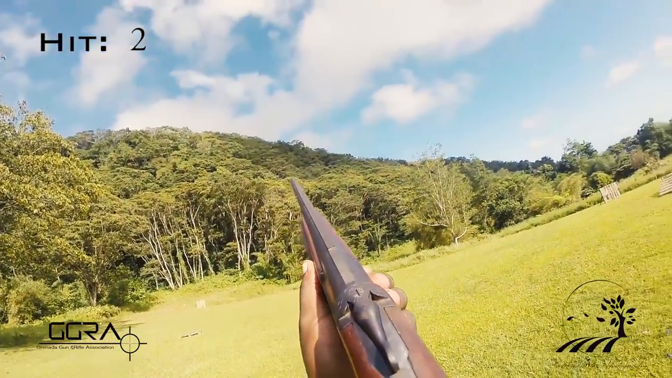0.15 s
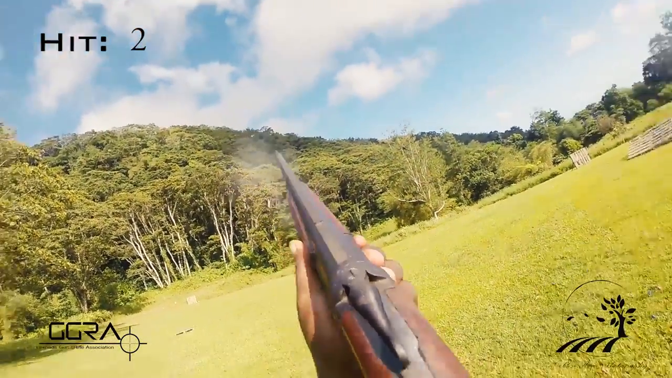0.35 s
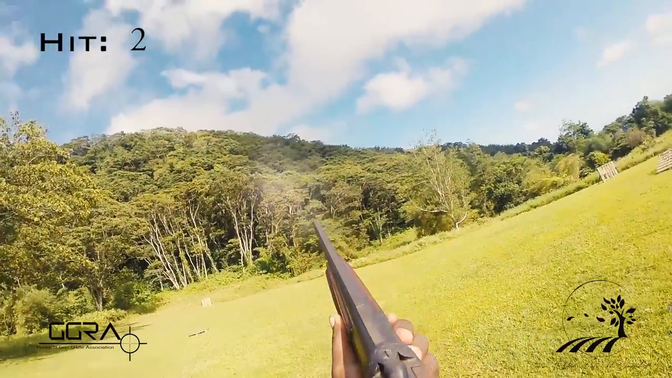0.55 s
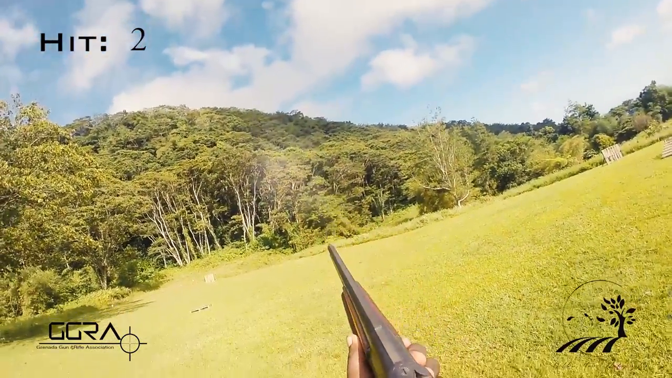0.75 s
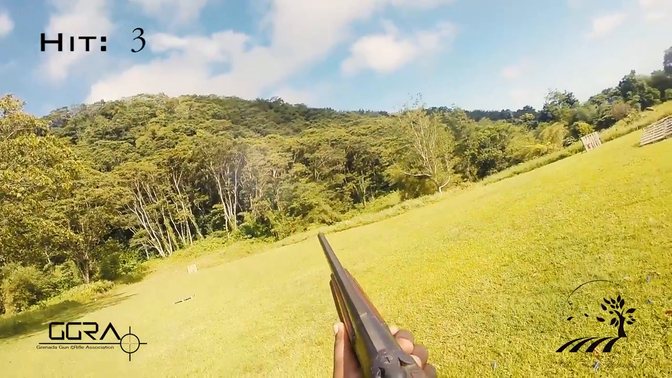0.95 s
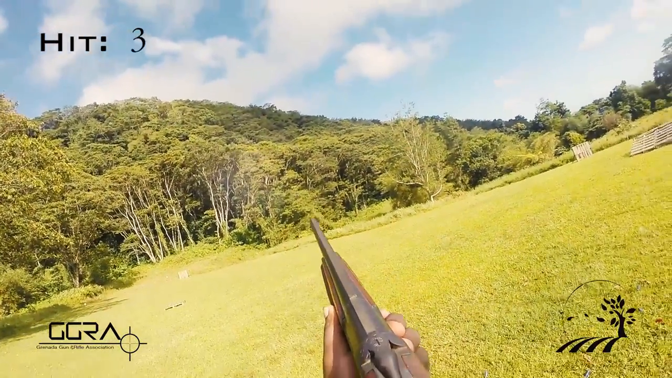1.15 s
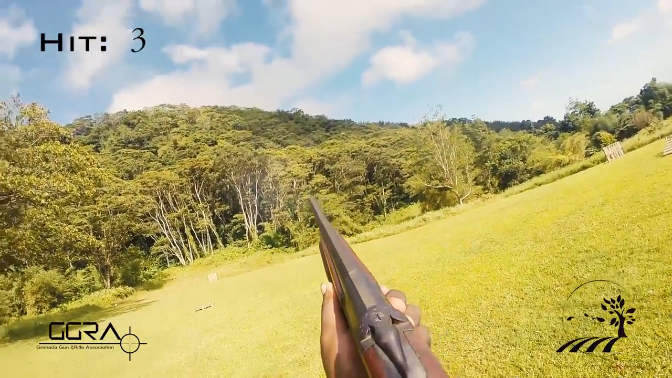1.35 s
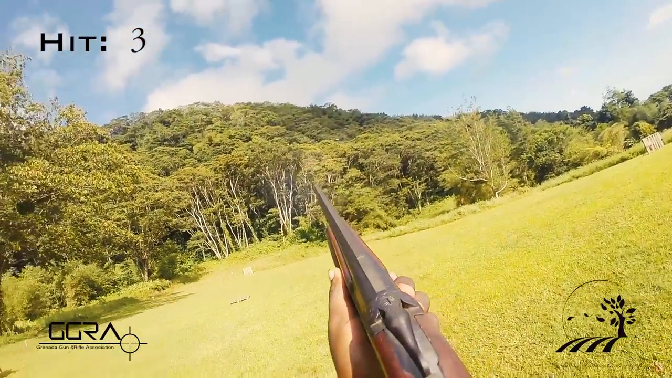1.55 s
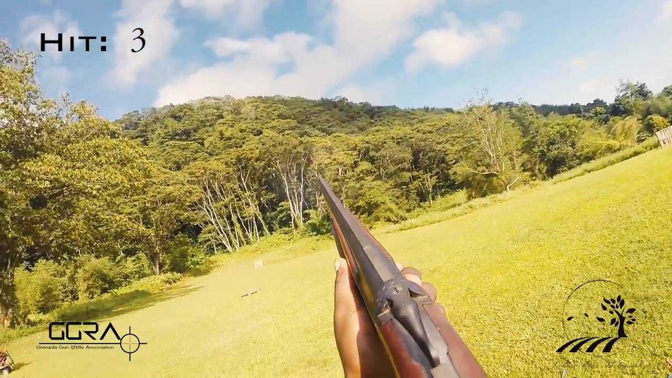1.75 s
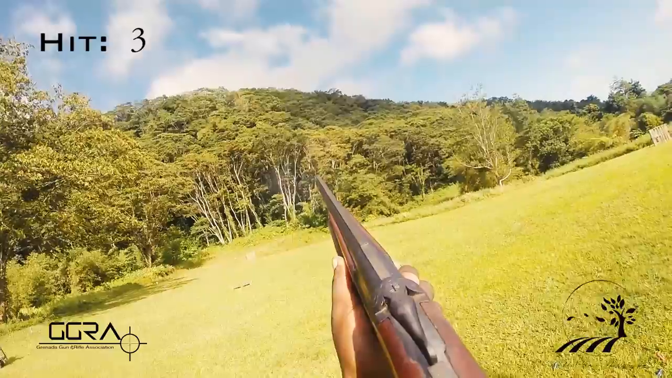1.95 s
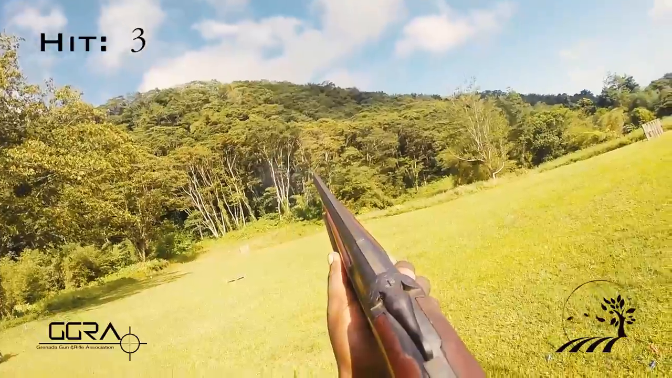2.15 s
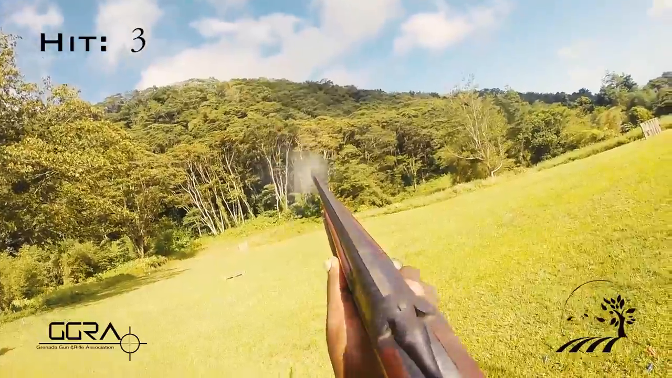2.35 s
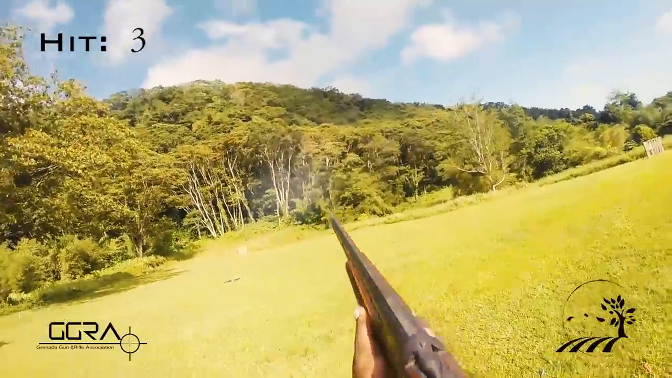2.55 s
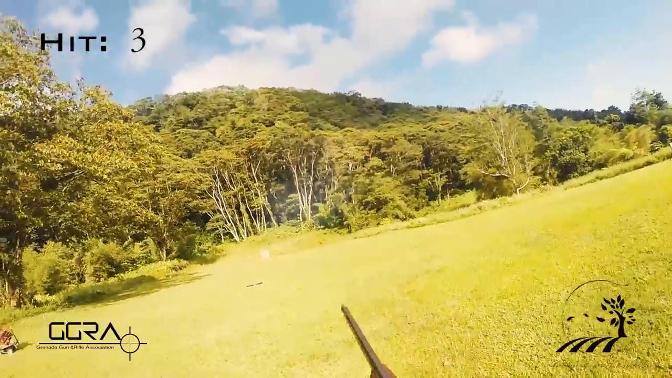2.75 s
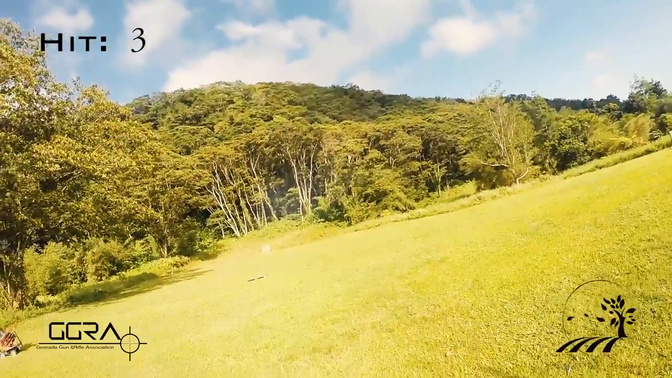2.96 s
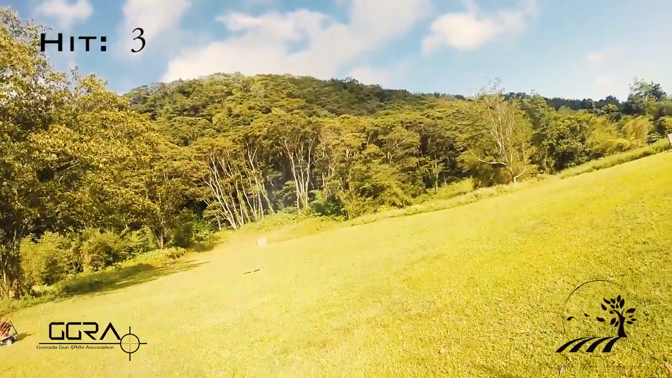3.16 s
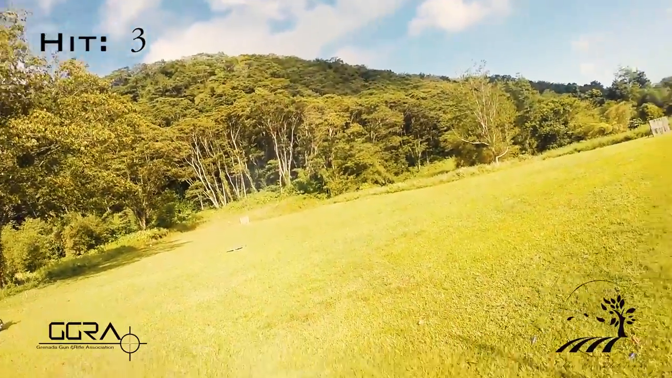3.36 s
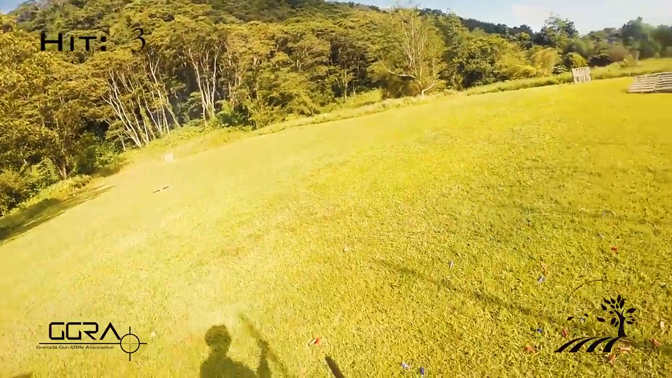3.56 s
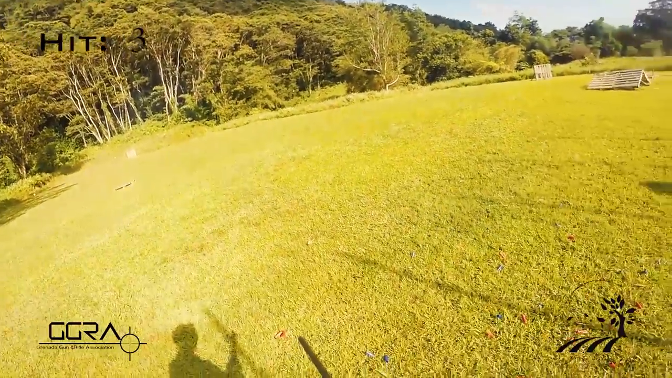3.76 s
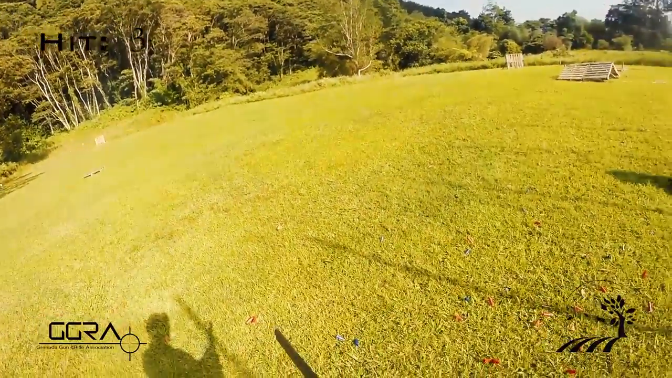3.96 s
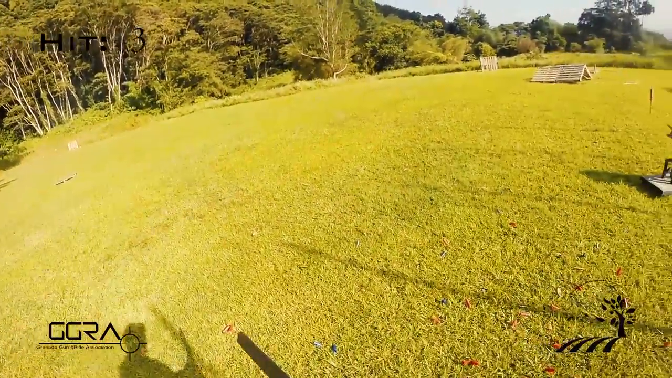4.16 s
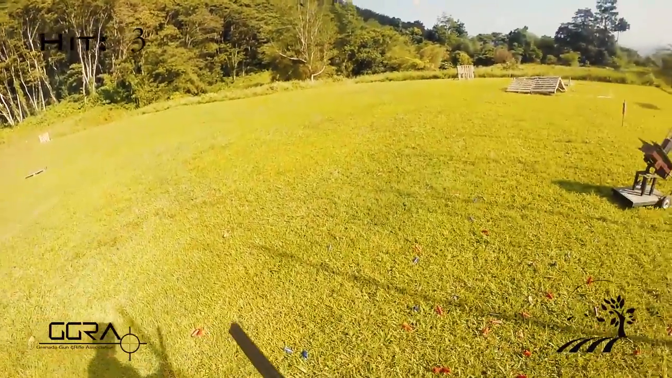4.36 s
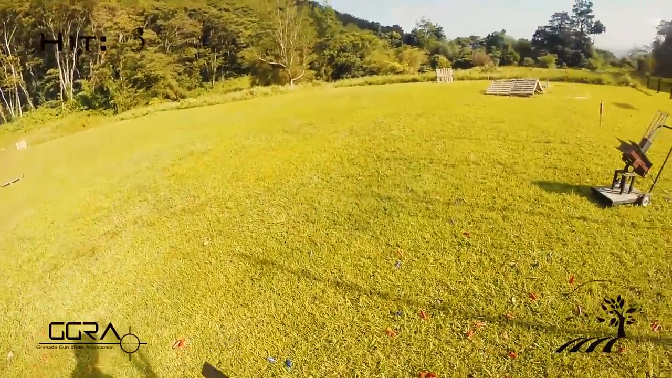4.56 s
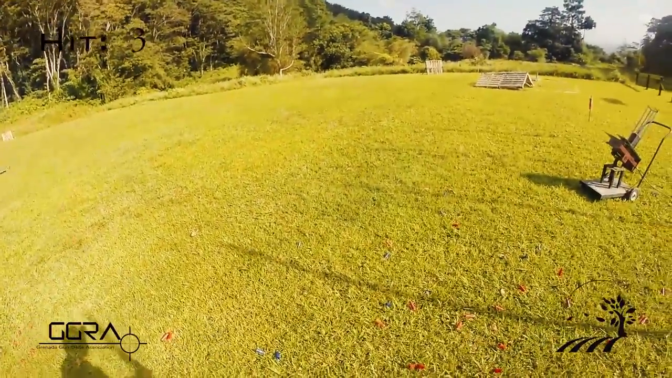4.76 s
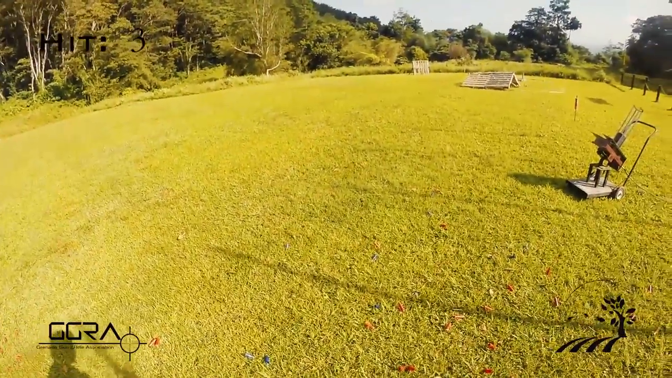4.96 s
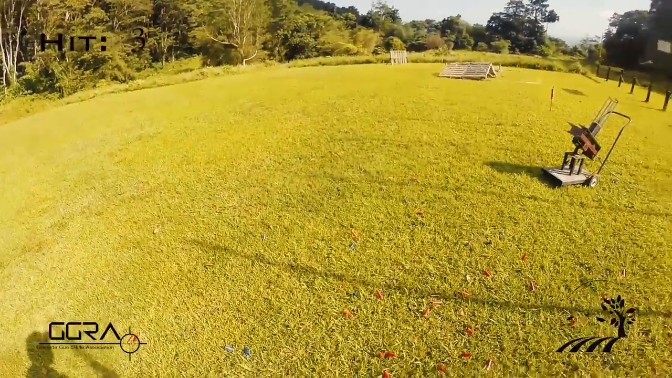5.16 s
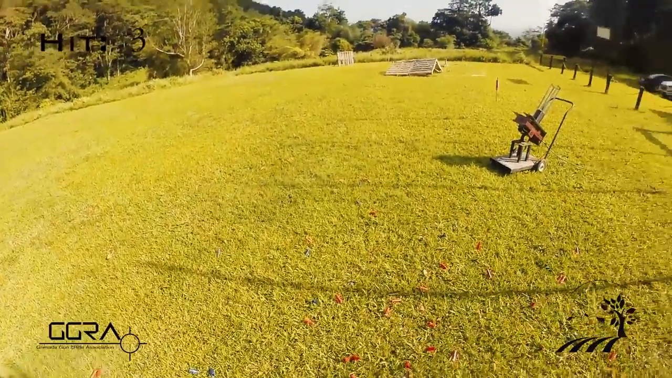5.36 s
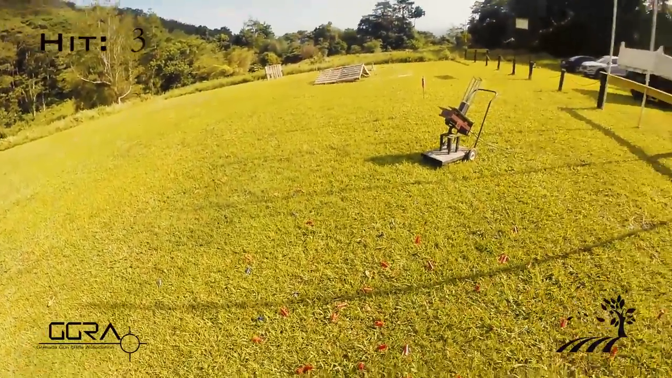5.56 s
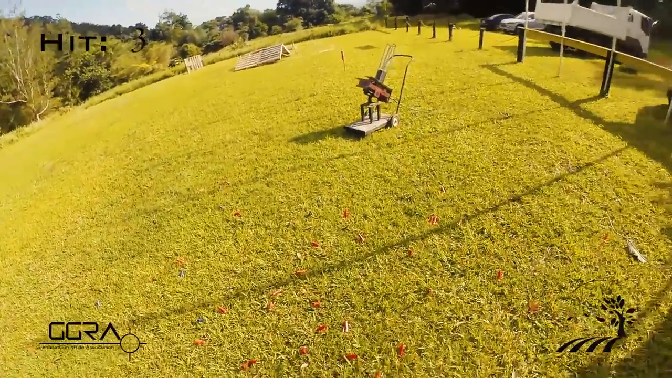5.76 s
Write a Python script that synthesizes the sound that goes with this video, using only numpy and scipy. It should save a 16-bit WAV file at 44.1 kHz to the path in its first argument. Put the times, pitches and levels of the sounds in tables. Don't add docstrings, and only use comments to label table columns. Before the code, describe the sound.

Two sharp shotgun blasts two seconds apart on open grass, each echoing off trees, then the gun clacks open amid faint handling bumps.

```python
import sys
import numpy as np
from scipy import signal
from scipy.fft import next_fast_len
from scipy.io import wavfile
from scipy.ndimage import uniform_filter1d

SR = 44100
rng = np.random.default_rng(int(sys.argv[2]) if len(sys.argv) > 2 else 0)


def dump_mix(stems):
    frames = np.atleast_2d(stems).T
    limited = np.clip(frames, -1, 1)
    pcm = np.round(limited * 32767).astype(np.int16)
    wavfile.write(sys.argv[1], SR, pcm)


def magnitude_from_level(level_db):
    exponent = np.asarray(level_db, float) / 20
    return 10 ** exponent


N = 255838
TIME = np.arange(N) / SR


def level(x, db):
    return x * magnitude_from_level(db) / np.sqrt(np.mean(x ** 2))


def ring(x, hz, width):
    return signal.lfilter(*signal.iirpeak(hz, hz / width, fs=SR), x)


def band(x, lo_hz, hi_hz):
    return signal.sosfilt(signal.butter(2, [lo_hz, hi_hz], "bandpass", fs=SR, output="sos"), x)


def noise():
    return rng.standard_normal(N)


def fade(t60, rise=0.0003):
    age = TIME[:int(1.2 * t60 * SR)]
    return (1 - np.exp(-age / rise)) * np.exp(-np.log(1000) * age / t60)


def walk(rate):
    k = int(SR / rate)
    steps = np.repeat(rng.standard_normal(N // k + 1), k)
    return 0.38 * uniform_filter1d(uniform_filter1d(steps, k), k)[:N]


def put(s, sound):
    out, start = np.zeros(N), int(round(s * SR))
    out[start:start + len(sound)] = sound[:N - start]
    return out


def puff(t60, rise=0.0005):
    shape = fade(t60, rise)
    return shape * rng.standard_normal(SR)[:len(shape)]


def struck(hz, t60, rise):
    shape = fade(t60, rise)
    return shape * np.sin(2 * np.pi * hz * TIME[:len(shape)])


# (t/s, peak level/dB, half length/s)
JOLTS = [(0.0, -40, 0.036), (0.1, -40, 0.015), (0.172, -41.5, .025), (0.477, -37, .045),
         (0.873, -51.5, .12), (1.405, -47.5, 0.28), (1.436, -33, 0.017), (1.53, -35.5, 0.019),
         (1.601, -38, 0.025), (1.755, -45, .04), (1.865, -40, 0.052), (2.07, -43, 0.071),
         (2.28, -41.5, .07), (2.58, -33.5, 0.04), (2.959, -53, 0.051), (3.07, -49.5, 0.021),
         (3.519, -45, 0.14), (3.67, -44, 0.024), (3.94, -40.5, 0.055), (4.024, -45.5, 0.032),
         (4.17, -49.5, 0.073), (4.349, -39, 0.043), (4.556, -34, 0.034), (4.72, -37.5, 0.062),
         (4.833, -32, .035), (4.948, -26.5, 0.031), (5.116, -35.5, 0.047), (5.31, -46, .07),
         (5.73, -53, .08)]
# (t/s, level/dB)
GUST = [(0.0, -41.5), (.24, -44.5), (.48, -37), (.58, -77), (1.45, -47), (1.92, -45), (2.0, -43.5),
        (2.37, -48.5), (2.47, -29.5), (2.65, -65.5), (2.8, -77.5), (3.63, -66), (3.83, -67), (4.6, -60),
        (4.94, -52.5), (5.02, -61), (5.4, -59), (5.8, -57)]
SWAY_DB = -57


def rumble():
    x = ring(ring(noise(), 35, 29), 33, 28)
    x = x / (np.abs(signal.hilbert(x, next_fast_len(N))[:N]) + 0.44 * x.std())
    free = 1 - sum(put(s - .01, np.hanning(4400) ** .3) for s, *_ in SHOTS)
    effort = magnitude_from_level(SWAY_DB) + sum(magnitude_from_level(db) * np.exp(-((TIME - s) / half) ** 2) for s, db, half in JOLTS)
    knocks = band(level(x, 0.) * effort * free, 28, 65)
    wind = magnitude_from_level(np.interp(TIME, *np.transpose(GUST))) * free
    gusts = level(ring(ring(noise(), 44, 30), 44, 30), -2.) * wind
    flutter = level(band(band(noise(), 62, 115), 62, 115), -13.) * wind
    return knocks + gusts + flutter


# (f/Hz, level per Hz/dB)
AIR = [(80, -6.5), (113, -9.5), (226, -10), (640, -17.5), (1280, -21), (5120, -32), (7240, -38),
       (14500, -45.5)]
# (f/Hz, width/Hz, level/dB)
HISS_PEAKS = [(5032, 110, -76.5), (10000, 220, -79.5), (8060, 250, -87)]
AIR_DB = -56.5


def air():
    hz, db = np.transpose(AIR)
    swell, out = walk(0.39), 0
    for centre in 80 * 2 ** np.arange(0, 7.7, .5):
        flicker = walk(8.3) * min(1.5, 600 / centre)
        part = band(noise(), centre * 2 ** -.25, centre * 2 ** .25)
        band_db = np.interp(np.log(centre), np.log(hz), db)
        out = out + magnitude_from_level(band_db + .6 * swell + flicker) * part
    peaks = sum(level(ring(noise(), f, width), peak_db) for f, width, peak_db in HISS_PEAKS)
    return level(out, AIR_DB) + peaks


DUCK_DB, DUCK_HOLD_S, DUCK_BACK_S = -14.5, 0.43, 0.35


def duck():
    db = 0
    for s, *_ in SHOTS:
        recovering = np.maximum(TIME - s - DUCK_HOLD_S, 0)
        db = db + DUCK_DB * (TIME > s) * np.exp(-recovering / DUCK_BACK_S)
    return magnitude_from_level(db)


# (t/s, peak
# level/dB, centre f/Hz, t60/s)
TICKS = [(.002, -46, 1350, 0.036), (.083, -46.5, 1480, 0.033), (.111, -53, 1470, 0.067),
         (.224, -51, 1350, .11), (.971, -40, 3500, 0.098), (1.0, -43, 1370, 0.81),
         (2.1425, -44, 1410, 0.033), (3.638, -43.5, 1410, 0.078), (5.068, -53.5, 4400, .1),
         (5.128, -55.5, 3850, 0.18), (5.127, -56, 4400, .057), (5.201, -61, 4400, .061),
         (5.199, -59, 5200, .066)]
# (t/s, peak level/dB, centre f/Hz, t60/s)
SCUFFS = [(.083, -53, 6000, .067), (2.1423, -48.5, 2760, .058), (2.141, -50.5, 6290, .072),
          (3.527, -34.5, 2080, 0.011), (3.5272, -47, 900, 0.016), (3.639, -41.5, 2340, 0.075),
          (3.64, -56, 5000, .11), (4.585, -45, 2590, .039), (4.74, -58, 6500, .027),
          (4.76, -47.5, 1740, 0.36), (4.978, -38.5, 1710, 0.013), (5.071, -53.5, 5500, .1),
          (5.13, -58, 5500, .15), (5.076, -47, 1300, 0.27), (5.072, -49.5, 2700, .2),
          (5.125, -51.5, 2200, .25)]
TICK_WIDTH_HZ = 220
SCUFF_WIDTH, RISE_SHARE = 0.41, 0.02


def ticks():
    rows = [(*row, TICK_WIDTH_HZ) for row in TICKS]
    rows += [(*row, SCUFF_WIDTH * row[2]) for row in SCUFFS]
    out = 0
    for s, db, hz, t60, width in rows:
        rung = ring(ring(puff(t60, RISE_SHARE * t60), hz, width), hz, width)
        out = out + put(s, magnitude_from_level(db) * rung / np.abs(rung).max())
    return out


# (blast t/s, blast level/dB, hammer lead/s, hammer level/dB)
SHOTS = [
    (0.3343, 3, .0045, -20),
    (2.458, 5, .005, -10.5),
]
# (case thump level/dB, delay/s)
RECOIL = [(-9, 0.01), (-10, .012)]
# (f/Hz, level/dB, rise/s, t60/s)
BLAST_MODES = [(330, -17, 0.00011, 0.0066), (1170, 5, 0.000091, 0.0072), (1350, -2, 0.00077, 0.018),
               (2064, -1.5, 0.0025, 0.019), (2356, 7, 0.0014, 0.012), (2820, -5, 0.0018, 0.026),
               (3520, -1, 0.000027, 0.012), (5200, -13.5, 0.00053, 0.018), (7800, -11, 0.000058, 0.011)]


def shots():
    out = 0
    limiter = magnitude_from_level(-9 * np.clip((TIME - .0024) / 0.0041, 0, 1))
    for (s, blast_db, lead, hammer_db), (thump_db, delay) in zip(SHOTS, RECOIL):
        rung = sum(put(0, -magnitude_from_level(db) * struck(hz, t60, rise)) for hz, db, rise, t60 in BLAST_MODES)
        gas = put(0, band(puff(0.013, 0.00018), 1800, 10500))
        out = out + put(s, magnitude_from_level(blast_db) * limiter * (rung + magnitude_from_level(-10) * gas))
        rattle = puff(0.038, 0.00082)
        stock = magnitude_from_level(17.5) * ring(rattle, 2700, 500)
        clatter = magnitude_from_level(2.0) * band(band(rattle, 1700, 6800), 1000, 7700)
        out = out + put(s - lead, magnitude_from_level(hammer_db) * (stock + clatter))
        out = out + put(s + delay, magnitude_from_level(thump_db) * struck(45, 0.1, .008))
    return out


# (f/Hz, width/Hz, level/dB)
CASE = [(1415, 110, 5.5), (2330, 130, -6), (2760, 34, -5.5), (3500, 23, -10), (4400, 130, -14),
        (5200, 140, -11), (6500, 220, -18), (7850, 300, -24)]


def case(x, leak_db=-20):
    return sum(magnitude_from_level(db) * ring(x, hz, width) for hz, width, db in CASE) + magnitude_from_level(leak_db) * x


# (t/s, peak level/dB, pulse
# length/ms, crackle level/dB)
SLAPS = [(0.3426, -22, .8, -31), (0.3964, -20, 1.2, -35), (0.4, -32, 1.1, -41), (0.4257, -20.5, 8.9, -28),
         (0.4264, -27, 1.8, -25.5), (0.467, -40, 2.5, -50), (0.841, -44.5, 1.5, -41),
         (2.466, -15.5, .8, -29.5), (2.4907, -23.5, 1.4, -40), (2.501, -28, 2.4, -37),
         (2.5346, -24, 4.1, -28), (2.9646, -37, 1.6, -60)]


def slaps():
    age = TIME[:900]
    shock = sum(put(s, magnitude_from_level(db) * (1 - age / ms * 3000) * np.exp(-age / ms * 2200))
                for s, db, ms, _ in SLAPS)
    rounded = band(band(shock, 60, 1900), 130, 2000)
    edges = sum(put(s, magnitude_from_level(db) * puff(0.015, 0.00017)) for s, _, _, db in SLAPS)
    crackle = magnitude_from_level(7.5) * ring(edges, 2900, 1400) + magnitude_from_level(-3.0) * ring(edges, 4800, 1000)
    return magnitude_from_level(3.5) * rounded + magnitude_from_level(8) * case(rounded) + band(band(crackle, 1000, 5800), 800, 6000)


# (echo level/dB, stretch of the echo delays/1)
AIM = [(.5, 1.0), (0, 1.06)]
# (delay/s, level near 1.4 kHz/dB, boom relative level/dB, depth/s, t60/s)
BELTS = [(.008, -39, -12.5, 0.0036, 0.29), (.03, -45, -17.5, .06, .3), (.105, -43.5, -19, .04, .2),
         (0.168, -57, -15, 0.23, .4), (0.306, -53, -9.5, .03, .5), (.33, -54, -13.5, .3, 1.2),
         (.5, -57, 0, 0.075, 0.71), (.64, -54.5, -1.5, 0.125, 1.5), (.8, -56.5, 1, .3, 1.5)]
BELT_RISE_S = .006
TREBLE_NEAR_DB, TREBLE_MID_DB, TREBLE_FAR_DB, GRASS_S, AIR_LOSS_S = 1, -11, -21, .025, .25
HAZE_DB, HAZE_T60_S = -60.5, 1.8
CROWNS_DB, CROWNS_S, CROWNS_SPREAD_S = -66.5, 0.31, 0.03


def belts():
    mid, boom, top = 1e-12, 1e-12, 1e-12
    for (s, *_), (aim_db, stretch) in zip(SHOTS, AIM):
        age = np.maximum(TIME - s, 0)
        air_loss_db = (TREBLE_MID_DB - TREBLE_FAR_DB) * np.exp(-age / AIR_LOSS_S)
        grass_loss_db = (TREBLE_NEAR_DB - TREBLE_MID_DB) * np.exp(-age / GRASS_S)
        dull_db = TREBLE_FAR_DB + air_loss_db + grass_loss_db
        top = top + (age > 0) * magnitude_from_level(HAZE_DB - 60 * age / HAZE_T60_S) ** 2
        top = top + magnitude_from_level(2 * CROWNS_DB) * np.exp(-((age - CROWNS_S) / CROWNS_SPREAD_S) ** 2)
        for delay, db, boom_db, depth, t60 in BELTS:
            since = np.maximum(age / stretch - delay, 0)
            decay = magnitude_from_level(db + aim_db - 60 * np.maximum(since - depth, 0) / t60)
            power = (decay * (1 - np.exp(-since / BELT_RISE_S))) ** 2
            mid = mid + power
            boom = boom + power * magnitude_from_level(2 * boom_db)
            top = top + power * magnitude_from_level(2 * dull_db)
    return np.sqrt(mid), np.sqrt(boom), np.sqrt(top)


def wash():
    mid_gain, boom_gain, top_gain = belts()
    mid = level(case(band(noise(), 750, 3400), leak_db=-13), 0.)
    mid = mid * mid_gain * magnitude_from_level(5.6 * walk(110) + 3.5 * walk(35))
    boom = level(band(band(noise(), 210, 760), 200, 1800), 0.) * boom_gain
    deep = level(band(noise(), 87, 180), -41.) * boom_gain ** 0.45
    top = level(case(band(band(noise(), 3600, 6900), 2500, 12500), leak_db=-15.5), 0.)
    top = top * top_gain * magnitude_from_level(1.6 * walk(130))
    fizz = level(band(noise(), 10500, 13500), -23.5) * top_gain
    return band(mid + top, 400, 12000) + boom + deep + fizz


# (t/s, peak level/dB, t60/s, top edge f/Hz)
CLAY = [
    (0.9716, -32.5, 0.1, 13000),
    (1.0064, -34.5, 0.68, 4570),
    (1.023, -37, 0.085, 10900),
    (1.048, -40, 0.25, 8500),
    (1.1, -45.5, 0.48, 7130),
]


def clay():
    burst = 0
    for s, db, t60, top_hz in CLAY:
        crack = band(band(puff(t60, 0.00082), 1700, top_hz), 1500, 13000)
        burst = burst + put(s, magnitude_from_level(db) * crack)
    return magnitude_from_level(9.5) * magnitude_from_level(2.7 * walk(150)) * band(case(burst, leak_db=-22.5), 1440, 14000)


# (t/s, level/dB, f/Hz, length/s)
CHIRPS = [
    (1.237, -78, 5600, 0.021),
    (1.275, -62, 5600, 0.025),
    (2.218, -64.5, 5150, .06),
    (2.306, -63, 5580, 0.016),
    (2.335, -61, 5700, .018),
    (4.117, -62.5, 5150, 0.062),
]


def chirps():
    out = 0
    for s, db, hz, length in CHIRPS:
        age = TIME[:int(length * SR)]
        note = (age * 62) % 1
        tone = np.sin(2 * np.pi * np.cumsum(hz * (1 + .03 * (note - .5))) / SR)
        out = out + put(s, magnitude_from_level(db) * np.sin(np.pi * note) * np.hanning(len(age)) ** .5 * tone)
    return out


# (t/s, peak level/dB, bright relative level/dB, rattle t60/s)
CLICKS = [
    (4.8767, -31, -4.5, 0.026),
    (4.905, -31.5, -3.5, 0.019),
    (4.9231, -40, 0, 0.025),
    (4.935, -17, -3.5, 0.031),
    (4.9387, -18, -6, 0.017),
]
# (f/Hz, level/dB, t60/s)
ACTION = [(1423, -6, 0.018), (1930, -7, 0.018), (2430, -3, 0.017), (2700, 6.5, 0.023), (3160, -5.5, 0.058),
          (3550, -28, 0.039), (5320, 0, .022), (6000, -1.5, 0.088), (6830, -4, 0.045), (7390, -3, 0.016)]
CLICK_RISE_S = 0.0012


def action():
    grit = magnitude_from_level(2.8 * walk(900))
    dull = grit * sum(put(s, magnitude_from_level(db) * puff(t60, CLICK_RISE_S)) for s, db, _, t60 in CLICKS)
    bright = grit * sum(put(s, magnitude_from_level(db + rel_db) * puff(t60, CLICK_RISE_S / 2))
                        for s, db, rel_db, t60 in CLICKS)
    body = sum(magnitude_from_level(db) * ring(dull if hz < 4000 else bright, hz, 2.77 / t60) for hz, db, t60 in ACTION)
    clack = magnitude_from_level(-2) * band(dull, 2000, 2800)
    sizzle = magnitude_from_level(-6) * band(band(bright, 5000, 10100), 5000, 16000)
    return magnitude_from_level(12.0) * band(body, 910, 17000) + clack + sizzle


def scene():
    blasts = shots() + slaps() + wash()
    small = clay() + action() + ticks() + chirps()
    background = rumble() + duck() * air()
    return (blasts + small + background)[None]


def roll_off(x):
    return signal.sosfilt(signal.butter(12, 15600, fs=SR, output="sos"), x)


def record(dry):
    rounded = 1.02 * np.tanh(dry + dry ** 3 / 3)
    lowpass = signal.ellip(8, .2, 50, 15100, fs=SR, output="sos")
    mix = np.clip(signal.sosfiltfilt(lowpass, rounded), -1, 1)
    return roll_off(mix)


dry = scene()
out = record(dry)
dump_mix(out)
```